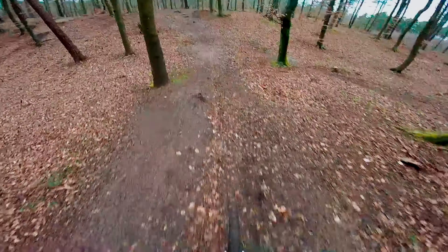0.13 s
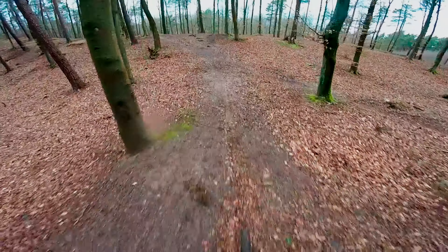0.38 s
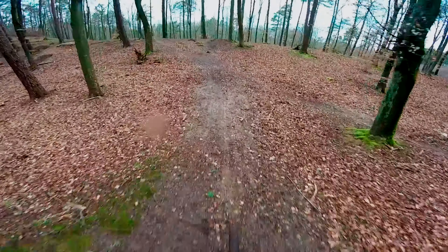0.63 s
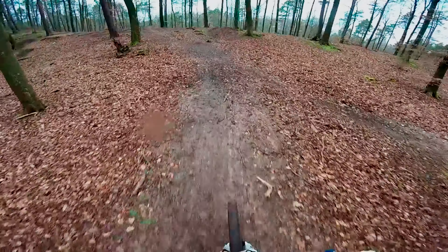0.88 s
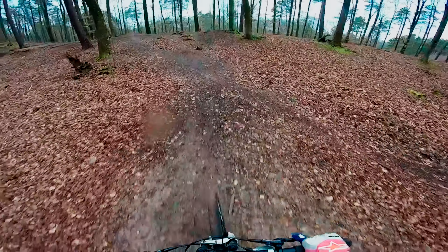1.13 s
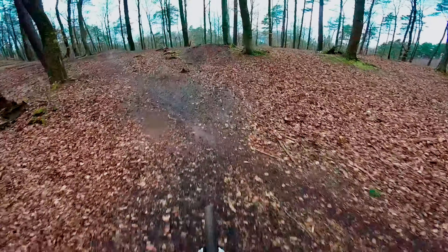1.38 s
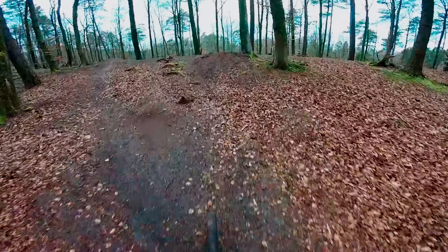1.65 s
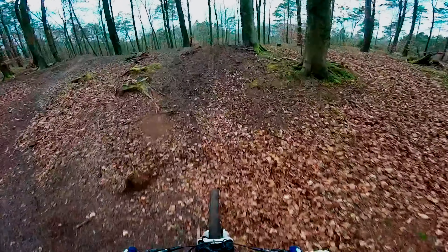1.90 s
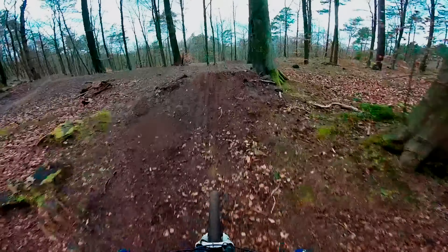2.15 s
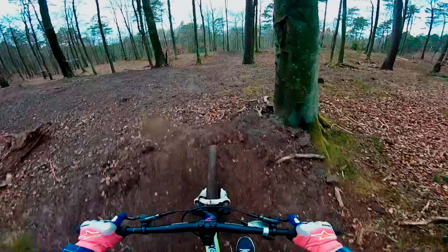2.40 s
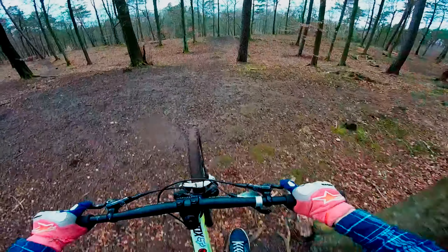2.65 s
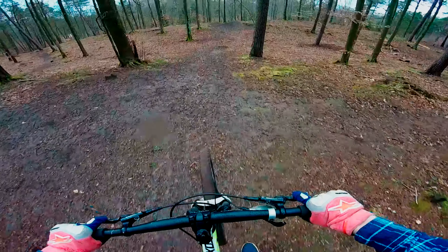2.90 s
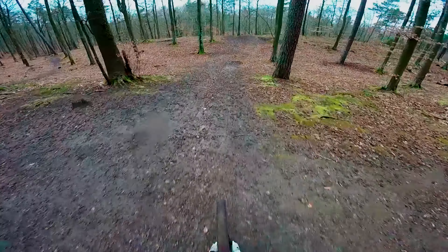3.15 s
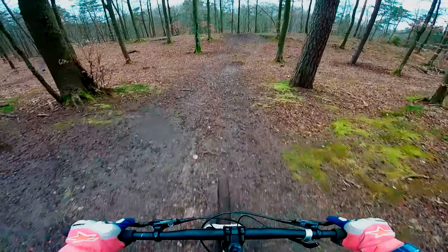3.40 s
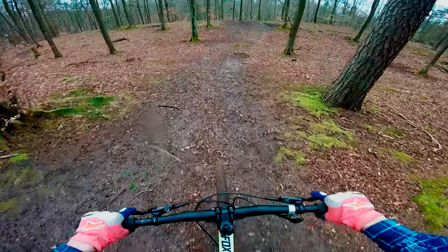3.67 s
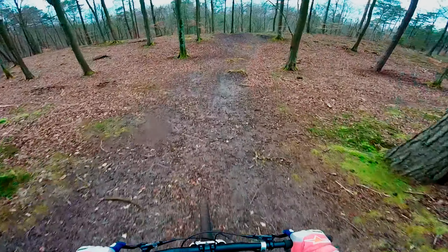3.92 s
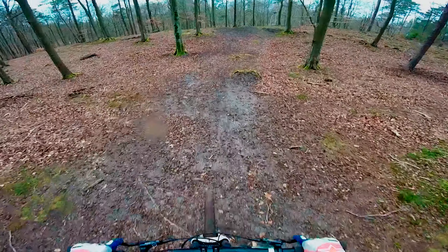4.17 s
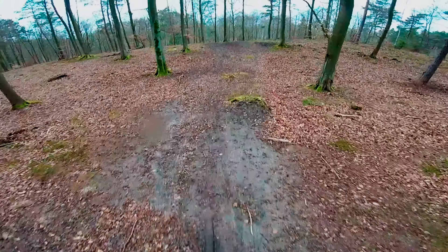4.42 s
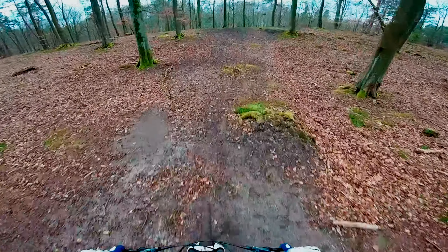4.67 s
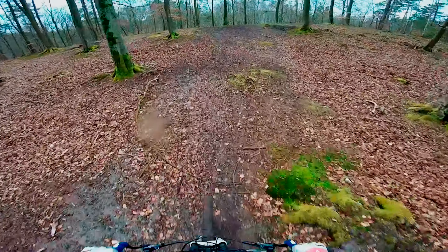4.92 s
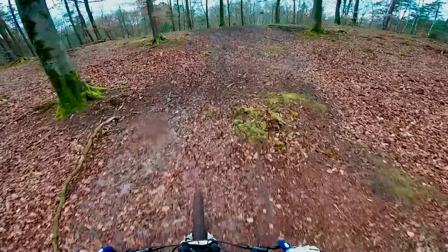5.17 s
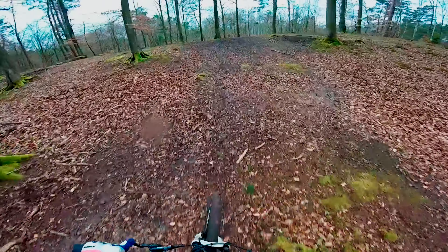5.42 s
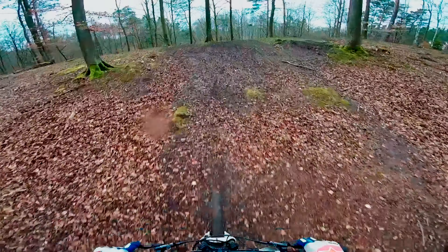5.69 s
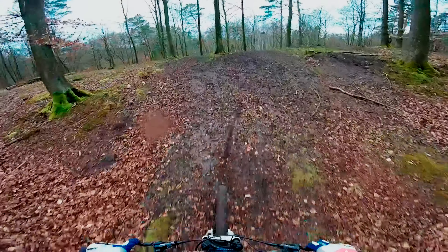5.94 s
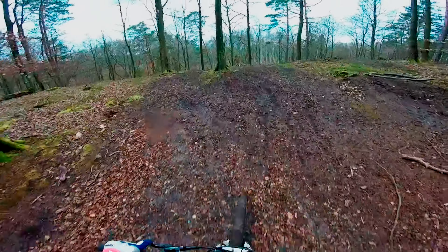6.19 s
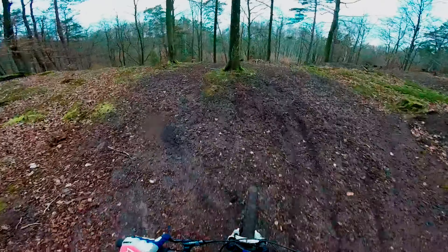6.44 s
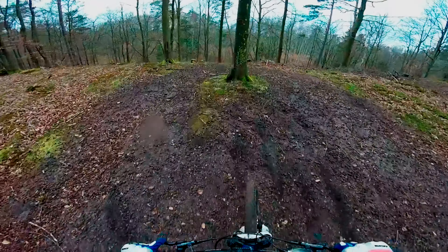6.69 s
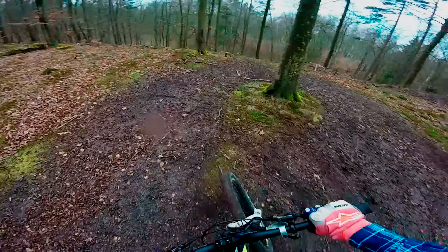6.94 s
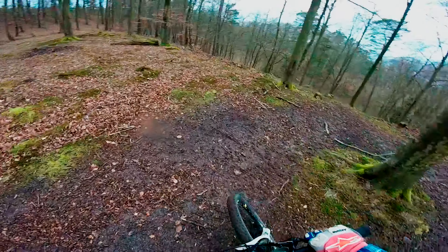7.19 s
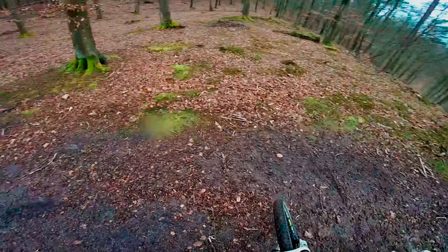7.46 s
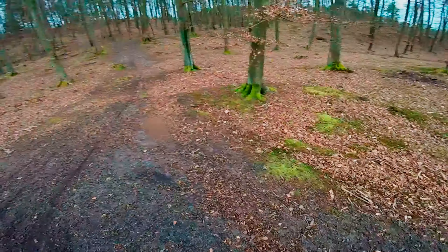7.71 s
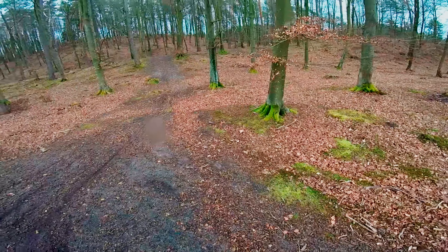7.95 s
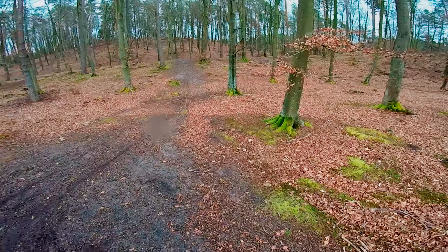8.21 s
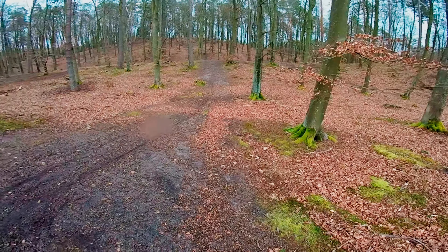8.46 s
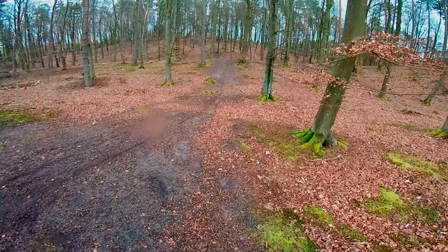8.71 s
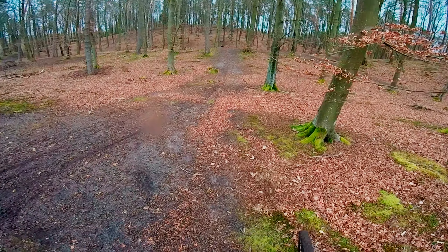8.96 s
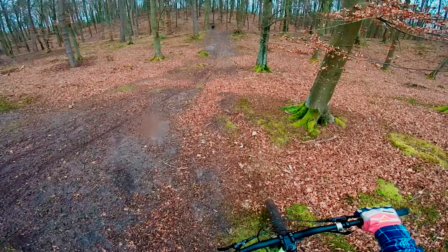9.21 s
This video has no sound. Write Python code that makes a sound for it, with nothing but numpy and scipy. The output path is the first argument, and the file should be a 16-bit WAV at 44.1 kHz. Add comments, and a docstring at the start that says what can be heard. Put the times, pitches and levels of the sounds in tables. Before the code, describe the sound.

A bicycle rattles down a stony dirt trail with low thumps, knocks and wind buffeting, then slows to faint clicks and near silence.

```python
"""A bicycle rolls down a dirt trail and stops, heard inside a small sealed camera shaken by the ride.
From the start bumps thump the tyre's low mode, rough ground hums in the frame, wind buffets the microphone,
loose parts rattle through the case resonances, grit and dust fizz as noise over a quiet air floor.
Knocks join at 0.2 s, gravel crunches at 0.4 s, pebble snaps at 0.7 s, rubbing squeaks at 4.7 s and
chain tinks at 6.4 s; from about 7.5 s the ride dies down to small knocks and a last faint squeak."""
import sys
import numpy as np
from scipy import signal
from scipy.fft import rfft, irfft, next_fast_len
from scipy.io import wavfile
from scipy.ndimage import map_coordinates

SR = 44100
rng = np.random.default_rng(int(sys.argv[2]) if len(sys.argv) > 2 else 0)


def elevation(decibels):
    """Turn decibel levels (scalar or array-like) into linear amplitude ratios."""
    levels = np.asarray(decibels, float)
    return 10 ** (levels / 20)


def log_audio(samples):
    """Write samples as a 16-bit WAV file to the path given in sys.argv[1]."""
    # one column per channel
    frames = np.atleast_2d(samples).T
    # limit to full scale, then quantise
    limited = np.clip(frames, -1, 1)
    pcm = np.round(limited * 32767).astype(np.int16)
    wavfile.write(sys.argv[1], SR, pcm)


N = 411894
SIZE = next_fast_len(N + SR // 2)
HZ = np.fft.rfftfreq(SIZE, 1 / SR)


def unit(x):
    """x at rms 1."""
    return x / np.sqrt(np.mean(x ** 2) + 1e-20)


def curves(rows):
    """One value per sample for each column after the time."""
    time_s, *columns = np.transpose(rows)
    return [np.interp(np.arange(N) / SR, time_s, column) for column in columns]


def wobble(knots_per_s):
    """Smooth random curve through normal random knots."""
    knots = rng.standard_normal(int(N * knots_per_s / SR) + 4)
    return map_coordinates(knots, [np.arange(N) * knots_per_s / SR])


def coloured(points):
    """Noise of rms 1, shaped by (frequency [Hz], relative level [dB])."""
    hz, db = np.transpose(points)
    gain = elevation(np.interp(np.log(HZ + 1), np.log(hz + 1), db))
    return unit(irfft(rfft(rng.standard_normal(SIZE)) * gain, SIZE)[:N])


def resonance(hz, width_hz):
    """Causal response of one mode, gain 1 at its centre."""
    return 1j * HZ * width_hz / (hz * hz - HZ * HZ + 1j * HZ * width_hz)


def rung(modes, force, order=1, top_hz=18000):
    """Sum of modes, each driven by its own force(hz); order 2 darkens the valleys; rolls off above top_hz."""
    total = 0
    for hz, width_hz, db in modes:
        total = total + elevation(db) * resonance(hz, width_hz) ** order * rfft(force(hz), SIZE)
    return irfft(total / (1 + 1j * HZ / top_hz) ** 2, SIZE)[:N]


def jolts(per_s, spread_db, life_s):
    """Envelope of random contacts: sudden rises of spread size, each decaying with time constant life_s."""
    size = elevation(np.minimum(spread_db * rng.exponential(size=N), 13))
    size = size * (rng.random(N) < per_s / SR)
    return signal.lfilter([1], [1, -np.exp(-1 / (life_s * SR))], size)


def blows(time_s, db, scatter_db, smear_s):
    """One impulse per blow, of random strength, sign and delay, drawn anew on each call."""
    luck = rng.random((len(time_s), 3))
    at = np.minimum((time_s + smear_s * luck[:, 0]) * SR, N - 1).astype(int)
    strength = elevation(db + scatter_db * (2 * luck[:, 1] + 1))
    return np.bincount(at, strength * np.sign(luck[:, 2] - .5), N)


# ground vibration: (time [s], frame hum level [dB], tyre thrum level [dB])
GROUND_LEVELS = [(0.0, -51, -34), (0.28, -44.5, -43.5), (0.55, -39, -35.5), (0.86, -40.5, -35),
                 (1.22, -47.5, -41), (1.51, -39, -43), (1.69, -41.5, -37.5), (2.03, -44, -44),
                 (2.55, -46.5, -39), (3.01, -50.5, -48), (3.41, -51, -45.5), (3.64, -51, -44),
                 (3.87, -47.5, -38), (4.21, -49, -48), (4.45, -46.5, -38), (5.82, -50, -51),
                 (6.4, -50.5, -44), (7.41, -61, -53), (7.96, -70.5, -63), (9.34, -69.5, -66)]
HUM_SWING_DB, THRUM_SWING_DB = 1.5, 3


def ground():
    """Frame and tyre levels in dB, each swung at random by uneven ground."""
    hum_db, thrum_db = curves(GROUND_LEVELS)
    return hum_db + HUM_SWING_DB * wobble(8), thrum_db + THRUM_SWING_DB * wobble(8)


# bumps under the tyre: (time [s], relative push level [dB], push length [s])
BUMP_PUSHES = [(-.007, 2.5, 0.0096), (0.012, -17, 0.012), (0.814, -23, 0.0084), (0.924, -21, 0.011),
               (1.535, -28, 0.0067), (3.252, -22, 0.018), (3.29, -15.5, 0.012), (3.309, -13, 0.016),
               (3.356, -19, 0.014), (3.378, -17, 0.017), (3.86, -5, 0.014), (3.906, -16, 0.0096),
               (4.483, -4.5, 0.012), (4.52, -18, 0.012), (4.575, -12, 0.018), (4.858, -18.5, 0.017),
               (6.872, -20, 0.0064), (7.269, -23.5, 0.0079), (8.191, -32, 0.0085)]
# tyre modes: (frequency [Hz], width [Hz], relative level [dB])
TYRE_MODES = [(77.4, 10.4, 0.5), (106.5, 25.2, -7.5)]


def tyre(level_db):
    """Rough ground keeps the low modes murmuring; each bump is one soft push that sets them ringing."""
    rough = lambda hz: elevation(3.25 * wobble(22)) * rng.standard_normal(N)
    thrum = elevation(level_db + 3.0) * unit(rung(TYRE_MODES, rough, order=2))
    t, push = np.arange(N) / SR, np.zeros(N)
    for time_s, db, length_s in BUMP_PUSHES:
        push += elevation(db) * np.sin(np.pi * np.clip((t - time_s) / length_s, 0, 1)) ** 2
    return thrum + elevation(9) * rung(TYRE_MODES, lambda hz: push) + elevation(-7) * push


# frame modes in the hum: (frequency [Hz], width [Hz], relative level [dB])
FRAME_MODES = [(237.1, 18.7, 2.5), (304.4, 37, -8), (354, 42, -15.5), (454, 19, -1), (472, 73, -11),
               (574, 22, -12), (775, 144, -16)]
# frame modes a knock reaches: (frequency [Hz], width [Hz], relative level [dB])
STRUCK_MODES = [(230, 24, -3), (474, 31.6, 0.5), (572, 56, -7)]


def frame(level_db, hits):
    """Ground vibration hums in the frame's modes; a knock rings a few of them."""
    time_s, db, share_db = hits[:3]
    shake = 3.0 + jolts(60, spread_db=5.5, life_s=0.0056)
    hum = unit(rung(FRAME_MODES, lambda hz: shake * rng.standard_normal(N), top_hz=1360))
    knock = rung(STRUCK_MODES, lambda hz: blows(time_s, db + share_db, 0.78, 0.0012), top_hz=1000)
    return elevation(level_db + 2.0) * hum + elevation(41.0) * knock


# wind at the microphone: (time [s], level [dB])
WIND_LEVELS = [(0.0, -28), (0.21, -42), (0.49, -30.5), (1.04, -28.5), (1.06, -42.5), (1.92, -32),
               (2.11, -50), (2.23, -31), (3.01, -48), (3.33, -23), (3.54, -48), (3.8, -40.5), (3.85, -23),
               (4.29, -45.5), (4.5, -17.5), (4.81, -50.5), (4.89, -28), (5.04, -42), (7.2, -42),
               (7.28, -33.5), (8.09, -64.5), (9.34, -50)]
# buffet spectrum: (frequency [Hz], relative level per Hz [dB])
BUFFET_SPECTRUM = [(8, -20), (22, 4), (45, -8.5), (70, -17), (150, -24), (400, -45), (1000, -54),
                   (3000, -120)]
GUST_DB, GUST_KNOTS_PER_S = 3, 7


def wind():
    """Lumpy low pressure swings at the microphone port: low noise under random gusts."""
    level_db = curves(WIND_LEVELS)[0] + GUST_DB * wobble(GUST_KNOTS_PER_S)
    return elevation(level_db) * unit(elevation(2.3 * wobble(7.9)) * coloured(BUFFET_SPECTRUM))


# loose parts and thrown grit: (time [s], rattle level [dB], grit level [dB])
SHAKE_LEVELS = [(0, -46, -60), (0.4, -43, -62.5), (0.7, -39, -60), (0.96, -41.5, -60.5), (1.7, -39.5, -59),
                (2.3, -44, -61), (2.5, -48, -69), (2.7, -47, -63.5), (2.88, -54.5, -79), (3.17, -50.5, -77),
                (3.45, -46.5, -58), (3.73, -50, -64.5), (4.1, -44, -58), (4.24, -49.5, -68),
                (4.7, -47, -66.5), (5.6, -45, -59.5), (5.85, -45.5, -62.5), (6.25, -47.5, -63.5),
                (6.6, -43, -61), (7.2, -43.5, -56), (7.45, -48.5, -62), (7.62, -57, -69),
                (7.68, -63.5, -74), (8.1, -69, -78), (9.15, -71, -74), (9.34, -58.5, -70)]


def loose_levels():
    """Steady rattle and grit levels in dB, before swings, crunches and knocks."""
    return curves(SHAKE_LEVELS)


AFTER_S, AFTER_RATTLE_DB, AFTER_GRIT_DB = 0.017, -27, -51.5  # decay constant; levels re knock


def shaking(steady_db, crunch, swing_db, hits, after_db):
    """Loose-layer level in dB: steady and crunch power swung by uneven stones, plus a decaying kick per knock."""
    kick = np.bincount((hits[0] * SR).astype(int), elevation(2 * (hits[1] + after_db)), N)
    after = signal.lfilter([1], [1, -np.exp(-1 / (AFTER_S * SR))], kick)
    return 10 * np.log10(after + (elevation(2 * steady_db) + crunch) * elevation(2 * swing_db))


# case modes for rattle and knocks: (frequency [Hz], width before knock widening [Hz], relative level [dB])
CASE_MODES = [(1197, 295, -4), (1540, 328, 1), (1960, 280, -5), (2210, 440, 0), (2570, 250, 4.5),
              (3058, 670, -4.5), (3674, 280, -14.5)]
# upper case modes for grit and cracks: (frequency [Hz], width [Hz], relative level [dB])
CASE_TOP_MODES = [(4220, 420, 4.5), (4830, 410, 2.5), (6060, 810, 4), (6540, 370, 0.5), (7660, 1030, -1),
                  (8880, 1200, -9.5)]


def case(rattle_db, grit_db, hits):
    """Loose parts chatter and knock, grit hits the frame; the camera case passes all through its modes."""
    time_s, db, _, treble_db, pitch_hz = hits
    chatter = jolts(110, spread_db=2.5, life_s=0.0026)
    clump = elevation(0.43 * wobble(15))
    spray = jolts(150, spread_db=7.5, life_s=0.0042)

    def rattle_force(hz):
        own_ticks = jolts(25, spread_db=3.5, life_s=0.0078)  # reach one mode only
        return clump * (1.77 + chatter + own_ticks) * rng.standard_normal(N)

    def grit_force(hz):
        return clump * (1.1 + 1.0 * chatter + 0.54 * spray) * rng.standard_normal(N)

    def bounce(level_db, lag_s):
        blow = blows(time_s + lag_s, level_db, 1.06, .0012)
        rebound = blows(time_s + .003, level_db - 5, 1.1, .007)
        return blow + rebound

    def knock_force(hz):
        off_pitch_db = 6 * abs(np.log2(hz / pitch_hz))  # where it lands picks the modes
        return bounce(db - off_pitch_db, 5 / hz - .0017)  # low bending waves arrive last

    rattle = unit(rung(CASE_MODES, rattle_force, order=2))
    grit = unit(rung(CASE_TOP_MODES, grit_force, order=2))
    knock_modes = [(hz, 1.15 * width_hz, level_db) for hz, width_hz, level_db in CASE_MODES]
    knock = rung(knock_modes, knock_force, order=2)
    crack = rung(CASE_TOP_MODES, lambda hz: bounce(db + treble_db, 0), order=2)
    loose = elevation(rattle_db - 0.54) * rattle + elevation(grit_db - 2.3) * grit
    return loose + elevation(25.5) * knock + elevation(22) * crack


# fine dust off the tread: (time [s], level [dB])
DUST_LEVELS = [(0.0, -67), (0.23, -75), (1.66, -83), (2.21, -62.5), (2.47, -85), (4.84, -78.5), (5.41, -69),
               (5.77, -77.5), (7.02, -73.5), (7.67, -86), (9.34, -85)]
# dust spectrum: (frequency [Hz], relative level per Hz [dB])
DUST_SPECTRUM = [(5000, -72), (7500, -5), (8900, -9), (11000, -12), (12800, -19), (15000, -27),
                 (16000, -120)]


def dust():
    """Fine dust hissing off the tread: thin treble noise flickering with random contacts."""
    flicker = 1.0 + jolts(120, spread_db=4.5, life_s=0.0032)
    return elevation(curves(DUST_LEVELS)[0]) * unit(flicker * coloured(DUST_SPECTRUM))


# quiet air spectrum: (frequency [Hz], relative level per Hz [dB])
AIR_SPECTRUM = [(40, -22), (100, -6), (300, -14), (1000, -16.5), (2600, -23), (4500, -27), (8000, -35),
                (12000, -39), (15000, -46), (16000, -120)]
AIR_DB = -62


def air():
    """Quiet air of the woods: steady shaped noise."""
    return elevation(AIR_DB) * coloured(AIR_SPECTRUM)


# knocks at set times, loud during the ride and small near the end:
# (time [s], level [dB], frame share [dB], treble share [dB], favoured pitch [Hz])
TIMED_KNOCKS = [(0.163, -25.5, -24, -20, 2460), (0.2651, -25.5, -18, -19, 2620),
                (0.4602, -21, -28, -22, 1550), (0.4983, -22, -18, -34.5, 2210),
                (0.6322, -25.5, -24, -40, 2250), (0.815, -26, -15, -22, 1540), (1.685, -23, -8, -39, 1490),
                (1.779, -27, -21, -23.5, 1520), (1.8607, -29, -3, -8, 1500), (2.0834, -23, -2.5, -21, 2610),
                (2.2403, -23, -12, -30, 2540), (2.3503, -29.5, -11, -24, 2560),
                (2.6154, -28.5, -10, -41.5, 1550), (3.2494, -22.5, -11, -21, 1530),
                (3.265, -18, -10, -22, 1500), (3.3296, -29, -29.5, -10.5, 2570),
                (3.458, -27.5, -10.5, -19, 1530), (3.6751, -22, -5, -30, 1880),
                (3.7948, -27.5, -9, -32, 2530), (3.8806, -35, -37, -15, 2530),
                (3.9345, -27.5, -8, -21, 2610), (4.6843, -26, -28, -21, 2570),
                (4.7324, -30.5, -30, -16, 2566), (4.8044, -23.5, -36.5, -16, 2570),
                (4.9565, -30, -7, -16, 2590), (4.9888, -24.5, -8.5, -26, 2580),
                (5.9374, -27.5, -18, -31, 2560), (5.9807, -25.5, -32, -29, 2580),
                (6.567, -25, -6.5, -25, 2500), (6.8622, -9.5, -8, -20, 1570),
                (6.9065, -27.5, -4, -28, 1550), (7.2185, -26, -32.5, -29, 2600),
                (7.2601, -25.5, -4.5, -25, 2500), (7.3625, -25, -33, -18, 3150),
                (7.3734, -21, -5.5, -29, 1540), (7.5138, -36, -1, -31, 2570),
                (7.6081, -30, -32, -18.5, 1610), (7.9101, -42, 2, -26, 2520), (8.183, -31, 4.5, -39, 1450),
                (8.2616, -50, -16, -17, 2600), (8.3695, -48, -18, -22, 2220), (8.49, -38.5, -17, -15, 3320),
                (8.553, -38, -16, -37, 2600), (8.6188, -46, -19, -12, 1730), (8.7166, -48, -16, -11, 1470),
                (8.768, -51, -19, -20, 2600), (8.967, -38, -19, -31, 1500), (9.0902, -43, -20, -24, 1660),
                (9.3288, -35.5, -24, -17, 2630)]
TICKS_PER_S, TICK_DB, TICK_SPREAD_DB = 4, 4.5, 2  # levels over the steady rattle


def knocks(rattle_db):
    """Columns of the knocks at set times and of random ticks that scale with the steady rattle."""
    luck = rng.random((int(TICKS_PER_S * N / SR), 5))
    time_s = luck[:, 0] * N / SR
    level_db = rattle_db[(luck[:, 0] * N).astype(int)] + TICK_DB
    level_db = level_db - TICK_SPREAD_DB * np.log(1 - luck[:, 1])
    frame_db, treble_db = -16 - 16 * luck[:, 2], -12 - 20 * luck[:, 3]
    pitch_hz = 1400 + 2000 * luck[:, 4]
    ticks = np.transpose([time_s, level_db, frame_db, treble_db, pitch_hz])
    return np.transpose(np.vstack([TIMED_KNOCKS, ticks]))


# wheels crossing loose gravel: (start [s], length [s], rattle level [dB], grit level [dB])
GRAVEL_CROSSINGS = [(0.438, 0.19, -38.5, -52.5), (0.767, 0.16, -46.5, -62), (1.966, 0.44, -44.5, -56),
                    (3.199, 0.15, -39, -51), (3.602, 0.037, -45.5, -57), (3.77, 0.19, -42.5, -54),
                    (4.275, 0.32, -44, -59), (4.795, 0.31, -45, -58), (5.13, 0.34, -51, -60.5),
                    (5.89, 0.18, -48.5, -58.5), (6.396, 0.2, -47.5, -60), (8.43, 0.11, -68, -71)]
CRUNCH_RISE_S, CRUNCH_FALL_S = 0.01, 0.026


def crunches():
    """Rattle and grit power of the gravel crossings: quick rise, hold, short fall."""
    t = np.arange(N) / SR
    start_s, length_s, *db = np.transpose(GRAVEL_CROSSINGS)
    rise = (t - start_s[:, None]) / CRUNCH_RISE_S
    fall = 1 + (start_s[:, None] + length_s[:, None] - t) / CRUNCH_FALL_S
    gates = np.clip(np.minimum(rise, fall), 0, 1)
    return elevation(2 * np.array(db)) @ gates ** 2


# grit snapping on the frame: (time [s], level [dB], pitch [Hz])
PEBBLE_SNAPS = [(0.701, -42.5, 5950), (0.9044, -44, 6500), (1.676, -43.5, 6060), (1.7789, -43, 5900),
                (1.816, -38.5, 6200), (2.3445, -41, 7600), (2.825, -51, 6450), (3.3285, -41, 7500),
                (3.483, -43, 8450), (3.483, -50, 12800), (4.6184, -40.5, 5600), (4.804, -42.5, 6420),
                (5.255, -53, 12400), (5.985, -38.5, 6540), (6.0863, -44, 6100), (7.2175, -37, 6470),
                (7.61, -46.5, 5830)]


def pebbles():
    """Each pebble is a noisy snap of a few milliseconds, centred on its own pitch."""
    out, t = np.zeros(N + SR), np.arange(SR // 50) / SR
    for time_s, db, hz in PEBBLE_SNAPS:
        flutter = np.convolve(rng.standard_normal(len(t)), np.hanning(20), "same")
        swell = elevation(db + 4.0 - 60 * t / 0.015) * (1 - np.exp(-t / 0.00031))
        out[round(time_s * SR):][:len(t)] += swell * unit(flutter) * np.sin(2 * np.pi * hz * t)
    return out[:N]


# rubbing whistles: (start [s], length [s], pitch [Hz], level [dB])
SQUEAK_WHISTLES = [(4.745, .05, 3680, -54), (4.87, .05, 3800, -53), (5.025, .03, 3620, -54),
                   (9.21, .11, 3700, -64)]


def squeaks():
    """A part rubs: brief breathy whistles, wavering in phase and fluttering in level."""
    t, out = np.arange(N) / SR, np.zeros(N)
    waver, flutter = wobble(150), unit(1 + wobble(250))
    for start_s, length_s, hz, db in SQUEAK_WHISTLES:
        swell = np.sin(np.pi * np.clip((t - start_s) / length_s, 0, 1))
        out += elevation(db) * flutter * swell * np.sin(2 * np.pi * hz * t + 1.7 * waver)
    return out


# chain link tinks: (time [s], level [dB])
CHAIN_TINKS = [(6.429, -38.5), (6.655, -37), (6.826, -46), (6.866, -39), (6.976, -57), (6.992, -41),
               (7.219, -33), (7.241, -50)]
# link modes: (frequency [Hz], mean relative level [dB], 60 dB decay time [s])
LINK_MODES = [(2600, -6, .09), (2945, -9, .06), (4285, -16, .06), (4875, 0, .065), (6560, -19, .08)]


def chain():
    """A slack link clicks as a noisy burst, then its modes ring briefly and unevenly."""
    out, t = np.zeros(N + SR), np.arange(SR // 5) / SR
    for time_s, db in CHAIN_TINKS:
        ring = np.zeros(len(t))
        for hz, level_db, t60_s in LINK_MODES:
            decay = elevation(level_db + rng.normal(0, 3.2) - 60 * t / t60_s)
            beat = 1 + 0.4 * np.sin(2 * np.pi * (rng.uniform(40, 110) * t + rng.random()))  # close mode pairs
            ring += decay * beat * np.sin(2 * np.pi * hz * t)
        flutter = unit(np.convolve(rng.standard_normal(len(t)), np.hanning(24), "same"))
        click = elevation(7.5 - 60 * t / 0.014) * np.sin(2 * np.pi * 3800 * t) * flutter
        out[round(time_s * SR):][:len(t)] += elevation(db) * (ring + click) * (1 - np.exp(-t / 0.00066))
    return out[:N]


RATTLE_SWING_DB, GRIT_SWING_RATIO = 1, 1.67  # uneven stones; grit swings that many times more


def scene():
    """All that shakes or blows at the microphone, over the quiet air of the woods."""
    hum_db, thrum_db = ground()
    steady_rattle_db, steady_grit_db = loose_levels()
    hits = knocks(steady_rattle_db)
    swing_db = RATTLE_SWING_DB * wobble(14)
    rattle_crunch, grit_crunch = crunches()
    rattle_db = shaking(steady_rattle_db, rattle_crunch, swing_db, hits, AFTER_RATTLE_DB)
    grit_db = shaking(steady_grit_db, grit_crunch, GRIT_SWING_RATIO * swing_db, hits, AFTER_GRIT_DB)
    body = tyre(thrum_db) + frame(hum_db, hits)
    loose = case(rattle_db, grit_db, hits)
    mix = body + wind() + loose + dust() + air() + pebbles() + squeaks() + chain()
    return mix[None]


def low_pass(x):
    """Removes everything above the highest recorded frequency."""
    return signal.sosfilt(signal.butter(12, 15100, fs=SR, output="sos"), x)


def record(dry):
    """The finished mix as the camera stores it."""
    return low_pass(dry)


dry = scene()
out = record(dry)
log_audio(out)
```